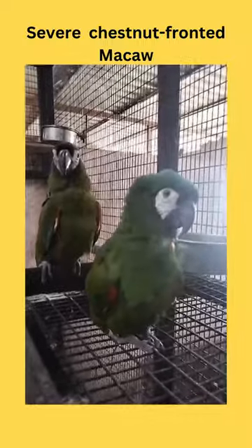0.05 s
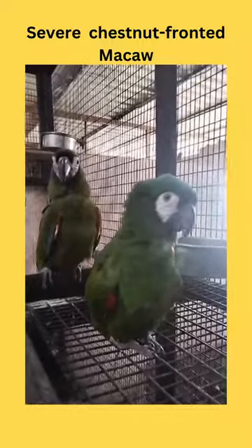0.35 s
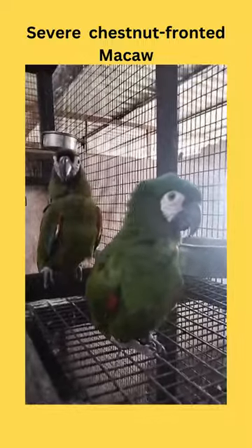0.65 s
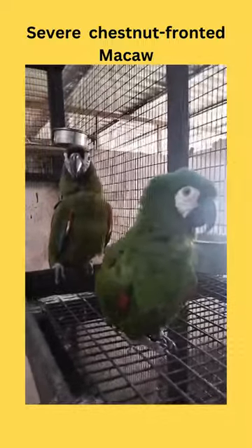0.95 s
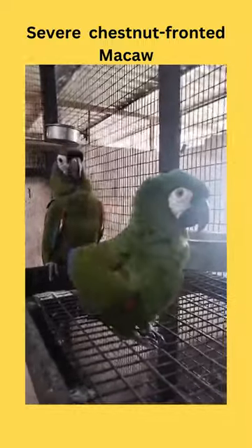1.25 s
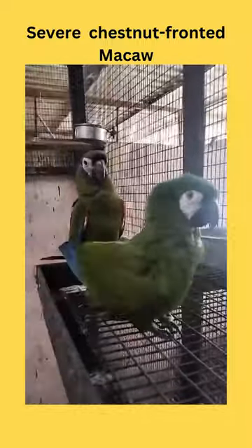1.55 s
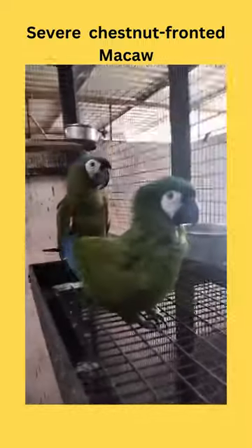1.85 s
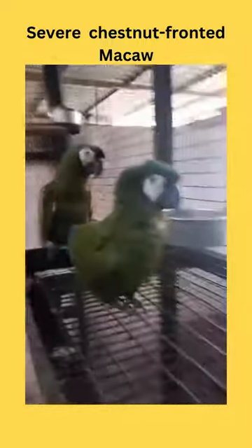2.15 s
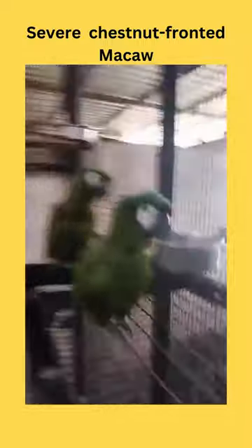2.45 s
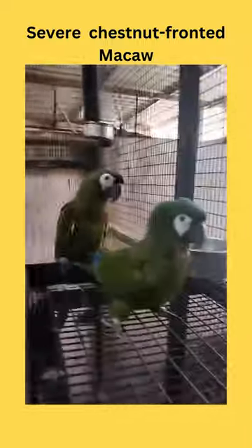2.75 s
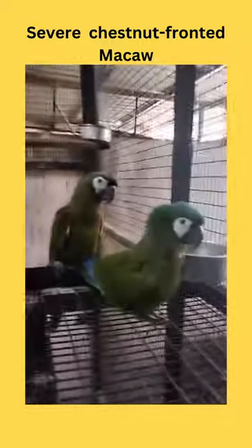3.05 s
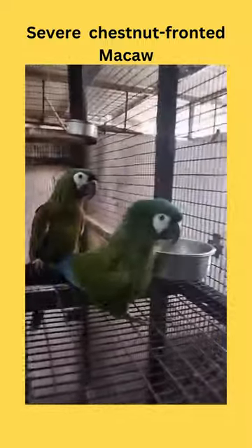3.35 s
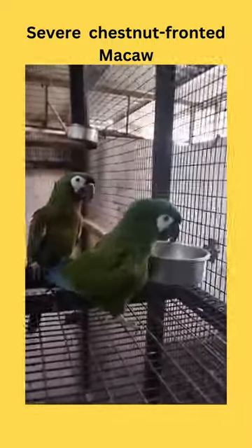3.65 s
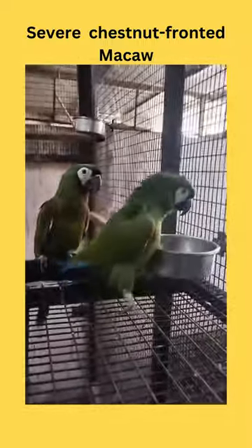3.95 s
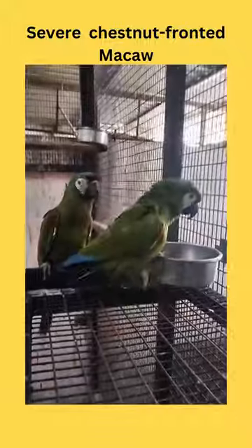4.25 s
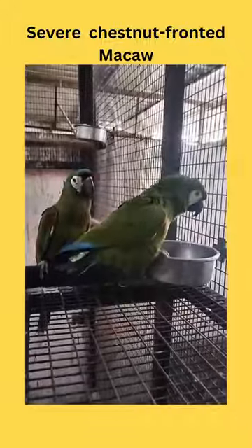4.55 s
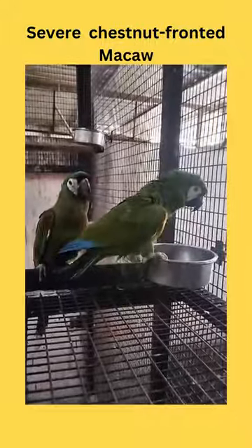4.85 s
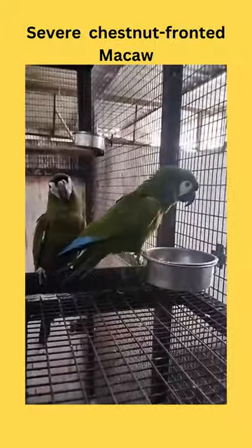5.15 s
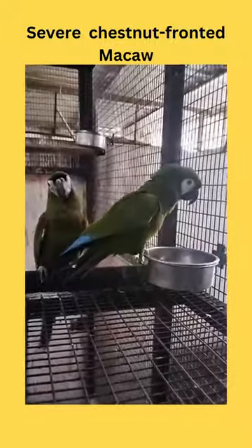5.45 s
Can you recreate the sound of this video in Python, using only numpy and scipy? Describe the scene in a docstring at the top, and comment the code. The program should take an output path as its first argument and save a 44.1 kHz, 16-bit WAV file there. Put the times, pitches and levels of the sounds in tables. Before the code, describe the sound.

Parrots squawk in raspy bursts with softer cries and chirps between, each call echoing briefly around a wire aviary.

```python
"""Small macaws squawk close by in a hard-walled wire aviary.
Syrinx membranes beat irregularly through throat and beak: a low rasp breaks up into a harsh tone
near 2 kHz. Thin chirps, plain cries, a dry growl and a stutter come between; the room rings after each.
Behind them: one soft knock on the cage, a puff of air, a far flock, the drone of distant machinery."""
import sys
import numpy as np
from scipy import signal
from scipy.fft import rfft, irfft, next_fast_len
from scipy.io import wavfile
from scipy.ndimage import uniform_filter1d, minimum_filter1d

SR = 44100
rng = np.random.default_rng(int(sys.argv[2]) if len(sys.argv) > 2 else 0)


def master(y):
    """Save y as 16-bit WAV."""
    cut = np.clip(np.atleast_2d(y).T, -1, 1)
    pcm = np.round(cut * 32767)  # scale
    wavfile.write(sys.argv[1], SR, pcm.astype(np.int16))


N = 246959
TIME = np.arange(N) / SR

# Levels are relative, ahead of room and mix gains.
# Squawks: (start [s], rasp [s], tone [s], pitch [Hz], sag [Hz], opening [dB], pre-break [dB], peak [dB],
# release [dB], rasp roughness [-], tone roughness [-], lows [dB], highs [dB], shudder [0-1])
SQUAWKS = [ (1.239, 0.083, 0.11, 1985, 70.3, -35, -19.5, -13, -19, 0.86, 0.17, -9.5, -6.5, 0.21),
           (2.071, 0.093, 0.064, 2125, 82.7, -33.5, -15.5, -13, -12.5, 0.84, 0.02, -25, -7, 0.18),
           (2.274, 0.082, 0.061, 2173, 40.6, -24, -19, -13.5, -14.5, 0.8, 0, -15.5, -5, 0.49),
           (2.655, .14, 0.12, 2130, 78.7, -39.5, -16.5, -17, -18.5, .92, 0.65, -9, -5, 0.29),
           (3.016, 0.04, 0.14, 2203, 163.8, -22, -21, -16, -18.5, 0.77, 0.23, -6.5, -2.5, .5),
           (3.573, 0.059, .1, 2143, 120.5, -15, -15, -14.5, -14, 0.06, 0.09, -11.5, -7, 0.74),
           (4.469, .046, 0.1, 2205, 49.8, -26, -17.5, -16.5, -17.5, 0.8, .24, -3, -6, 0.12),
           (4.6, .028, .115, 2143, 134.8, -17, -19, -17, -17, .9, 0.3, -0.5, -5, .15),
           (4.765, 0.047, 0.058, 2122, 54.3, -20, -24, -18, -21, 0.87, .22, -11, -3, .12),
           (4.889, 0.063, 0.082, 2164, 125, -23.5, -21.5, -15.5, -16.5, 0.92, 0.35, -14.5, -4.5, .12),
           (5.445, .034, 0.18, 2204, 275.3, -34, -17, -12.5, -13.5, .9, 0.16, -4.5, -6.5, 0.15)]
# Chirps: (start [s], length [s], pitch [Hz], slide [Hz], opening [dB], peak [dB], roughness [-],
# lows [dB], highs [dB])
CHIRPS = [ (0.269, .21, 2358, 81.4, -31.5, -24.5, 0.34, -4, -4.5),
          (.499, 0.097, 1524, 210.4, -24.5, -25, 0.89, -9.5, 8.5),
          (.915, .11, 1458, 129.4, -29.5, -22, 0.93, -12, 4),
          (3.937, 0.12, 1295, 101, -32, -29, .8, -8.5, 5),
          (4.3, .11, 1412, 271.4, -30, -21, 0.85, -15.5, 2.5)]
# Cries: (start [s], swell [s], fade [s], pitch [Hz], glide [Hz], peak [dB], roughness [-],
# lows [dB], highs [dB])
CRIES = [ (0, 0.062, 0.12, 1203, -25.5, -24.5, .75, -19, -5.5),
         (.28, 0.087, 0.14, 1221, 39.5, -30.5, .7, -1.5, -6),
         (.497, .043, 0.049, 1481, 68.5, -36.5, .2, 17, -7),
         (1.46, 0.16, 0.084, 1766, -78.5, -25.5, 1.08, -1.5, -8),
         (1.788, .044, 0.048, 1684, 36.5, -21, 0.22, 2.5, -4),
         (1.96, 0.1, 0.042, 1888, 99.5, -29.5, 0.77, -1, -4.5),
         (3.36, 0.087, .12, 2117, -3, -30.5, 0.82, -5.5, -6.5),
         (3.8, 0.034, .018, 1506, -15, -38.5, 0.29, 13.5, 3),
         (4.124, .02, 0.025, 1337, -230, -22.5, 0.21, 1, -6),
         (5.13, 0.12, .07, 2352, -130, -26.5, 0.92, 1, -5.5)]
# Period doubling: (pitch [Hz], half-harmonic strength [0-1])
DOUBLING = [(1600, 0.32), (2000, 0.42), (2170, 0.24), (2260, 0.5)]
# Throat and beak response: (frequency [Hz], gain [dB])
THROAT = [(400, -28), (950, -10.5), (1400, -4), (2100, 8), (2600, -1.5), (3200, 8), (4200, 6), (5000, 4),
          (6300, 1.5), (7400, -6), (9000, -8.5), (10500, -6), (12500, -9), (14500, -14.5)]
# Tighter throat of the chirps: (frequency [Hz], gain [dB])
TIGHT_THROAT = [(400, -40), (950, -30), (1500, -4), (2100, -1), (2800, 4.5), (3700, 4.5), (4800, 12),
                (6500, 6), (7800, -13.5), (9000, -11.5), (11000, -2), (12500, -1.5), (14500, -19)]
# Croaks, single or in a stutter: (time [s], peak [dB])
CROAKS = [(.501, -7.5), (4.049, -21), (4.067, -15), (4.086, -12), (4.104, -8), (4.122, -10), (5.451, -11)]
# Growl envelope: (time [s], level [dB])
GROWL_LEVEL = [(1.438, -19.5), (1.538, -19), (1.626, -15), (1.76, -30)]
# Growl spectrum: (frequency [Hz], gain [dB])
GROWL_COLOUR = [(210, -63), (350, -31.5), (1500, 5.5), (1840, 5.5), (2160, 1.5), (3520, -2), (4210, -19),
                (6670, -7), (9000, -48), (11700, -70), (19800, -120)]
# Aviary decay: (frequency [Hz], T60 [s])
ROOM_T60 = [(300, 0.29), (1400, 0.58), (3000, 0.62), (5600, 0.6), (9000, 0.44), (14000, 0.38)]
# Response of the partly shaded left side: (frequency [Hz], gain [dB])
LEFT_COLOUR = [(300, 13), (1200, -9), (2200, -5), (3500, -8.5), (4500, -3.5), (6000, -2.5), (9000, 6.5),
               (13000, 0.5)]
# Far flock envelope: (time [s], level [dB])
FLOCK_LEVEL = [(0, -35.5), (.4, -27), (.7, -38.5), (1.2, -42.5), (2, -29.5), (3.3, -46), (4.2, -33),
               (5.25, -43.5), (5.4, -35), (5.6, -51.5)]
# Far flock spectrum: (frequency [Hz], gain [dB])
FLOCK_COLOUR = [(500, -16), (1200, -2), (2200, 0.5), (3700, 1.5), (6500, -9), (8000, -18.5), (12000, -25),
                (14500, -25)]
# Machinery roar envelope: (time [s], level [dB])
ROAR_LEVEL = [(0, -42.5), (.6, -49.5), (1.8, -48), (2.2, -48), (3.2, -57), (4.3, -54.5), (4.7, -61),
              (5.2, -57), (5.6, -44)]
# Machinery roar spectrum: (frequency [Hz], gain [dB])
ROAR_COLOUR = [(15, -49), (25, -20), (107, -1), (182, 7.5), (206, 0.5), (240, -2), (388, -3), (519, -8),
               (1100, -13.5), (1220, -9), (1500, -12), (1950, -51), (3300, -120)]
# Machinery hum lines: (frequency [Hz], level [dB])
HUM_LINES = [(146, -61), (192, -55)]

OPENING_ROUGH_SHARE, RELEASE_FALL_HZ = .75, 50.3


def squawk(start_s, rasp_s, tone_s, tone_hz, sag_hz, opening_db, break_db, peak_db, release_db,
           rasp_rough, tone_rough, lows_db, highs_db, shudder):
    """A rasp climbs until the voice breaks upward; the tone peaks, sags and is released."""
    break_s, break_rough = .017, .136
    crest_share, hold_share = .18, .712
    rasp_lows_db, rasp_highs_db = -9, -6
    mellow_db = .78 * (break_db - opening_db)  # softer voice, larger share of lows
    jump_s = start_s + rasp_s
    crest_s = jump_s + crest_share * tone_s
    release_s = jump_s + hold_share * tone_s
    end_s = jump_s + tone_s
    contour = [(start_s, .5 * tone_hz, OPENING_ROUGH_SHARE * rasp_rough),
               (start_s + .22 * rasp_s, .62 * tone_hz, OPENING_ROUGH_SHARE * rasp_rough),
               (jump_s - break_s, .72 * tone_hz, rasp_rough),
               (jump_s, tone_hz, tone_rough + break_rough),
               (crest_s, tone_hz - crest_share * sag_hz, tone_rough),
               (release_s, tone_hz - hold_share * sag_hz, tone_rough),
               (end_s, tone_hz - sag_hz - RELEASE_FALL_HZ, tone_rough + break_rough)]
    effort = [(start_s, opening_db, rasp_lows_db + mellow_db, rasp_highs_db),
              (jump_s - break_s, break_db, rasp_lows_db, rasp_highs_db),
              (crest_s, peak_db, lows_db, highs_db),
              (release_s, release_db, lows_db, highs_db),
              (end_s, release_db - 6, lows_db, highs_db)]
    return vocal_tract(contour, effort, THROAT, shudder)


def syrinx(pitch_hz, rough, shudder, shudder_hz=68, jitter_hz=210, slope_db_oct=-7, shimmer_db=5):
    """Membranes beat irregularly; each shudder pulls pitch and strength down together."""
    size = len(pitch_hz)
    shudder_cycles = np.cumsum(shudder_hz * (1 + .194 * wander(40.8, size))) / SR
    dip = shudder * np.sin(np.pi * shudder_cycles) ** 8
    # Slips below the taut pitch put a skirt under each harmonic.
    slip = .115 * rough ** 1.7 * (np.minimum(wander(jitter_hz, size) ** 2, 5) - .55)
    waver = .008 * wander(70, size)
    phase = 2 * np.pi * np.cumsum(pitch_hz * (1 - slip + waver) * (1 - .25 * dip)) / SR
    # Weak alternate beats add lines halfway between harmonics.
    halves = at_hz(DOUBLING, pitch_hz) * (.2 + rough) * (1 + 1.2 * wander(150, size))
    tone = from_db(-5) * halves * np.sin(phase / 2)
    for k in np.arange(2, 21) / 2:
        strength = from_db(slope_db_oct * np.log2(k)) * (halves * .91 / k if k % 1 else 1)
        tone += strength * (k * pitch_hz < SR * .4) * np.sin(k * phase + rng.uniform(0, 2 * np.pi))
    hiss = butter(rng.standard_normal(size), 5000, "low", order=1)
    breath = .45 * rough ** 2 * hiss * (1 + np.cos(phase))
    shimmer = from_db(shimmer_db * rough * np.minimum(wander(296, size), 1))
    return (tone + breath) * shimmer * (1 - np.clip(dip, 0, .9))


def vocal_tract(contour, effort, throat, shudder, edge_s=.008, shudder_build_s=.0493):
    """The throat filters the syrinx; the opening beak shifts power between low and high resonances.
    contour: (time [s], pitch [Hz], roughness [-])
    effort: (time [s], level [dB], lows [dB], highs [dB])"""
    start_s, end_s = effort[0][0], effort[-1][0]
    span = (TIME > start_s - edge_s / 2) & (TIME < end_s + edge_s)
    t = TIME[span]
    level_db, lows_db, highs_db = at_time(effort, t)
    hesitation_s = .0045 * wander(130, len(t))  # flips between registers at a break
    pitch_hz, rough = at_time(contour, t + hesitation_s)
    onset = np.clip((t - start_s) / shudder_build_s, 0, 1) ** 2
    voice = coloured(syrinx(pitch_hz, rough, shudder * onset), throat)
    lows = butter(voice, 3520, "low", order=6)
    mids = butter(voice, [2500, 5000], "band", order=5)
    highs = butter(voice, [5000, 8000], "band", order=5)
    top_db = 3 + .6 * np.minimum(highs_db, 3)  # a wide beak favours the very top
    highs += from_db(top_db) * butter(voice, 7144, "high", order=5)
    throb_db = 3.5 * wander(70, len(t))
    balanced = (from_db(lows_db - 1 + throb_db) * levelled(lows)
                + levelled(mids)
                + from_db(highs_db - 3) * levelled(highs))
    gate = np.clip(np.minimum(t - t[0], t[-1] - t) / edge_s, 0, 1)
    out = np.zeros(N)
    out[span] = balanced * from_db(level_db) * gate
    return out


def chirp(start_s, length_s, pitch_hz, slide_hz, opening_db, peak_db, rough, lows_db, highs_db):
    """A thin note through a tight throat slides up, holds and drops away."""
    top_s, release_s, end_s = start_s + length_s * np.array([.4, .672, 1])
    contour = [(start_s, pitch_hz - slide_hz, OPENING_ROUGH_SHARE * rough),
               (top_s, pitch_hz, rough),
               (release_s, pitch_hz, rough),
               (end_s, pitch_hz - RELEASE_FALL_HZ, rough)]
    swell = [(start_s, opening_db), (top_s, peak_db), (release_s, peak_db), (end_s, peak_db - 12)]
    effort = [(s, db, lows_db, highs_db) for s, db in swell]
    return vocal_tract(contour, effort, TIGHT_THROAT, shudder=.0974)


def cry(start_s, swell_s, fade_s, pitch_hz, glide_hz, peak_db, rough, lows_db, highs_db):
    """One gliding note swells and fades, clearest and brightest at its peak."""
    edge_db, edge_rough, mellow_db_per_db = -9, .1243, .32
    crest_s = start_s + swell_s
    end_s = crest_s + fade_s
    contour = [(start_s, pitch_hz, rough + edge_rough),
               (crest_s, pitch_hz + glide_hz / 2, rough),
               (end_s, pitch_hz + glide_hz, rough + edge_rough)]
    swell = [(start_s, edge_db), (crest_s, 0), (end_s, edge_db)]
    effort = [(s, peak_db + db, lows_db - mellow_db_per_db * db, highs_db) for s, db in swell]
    return vocal_tract(contour, effort, THROAT, shudder=.0664)


def croaks(pitch_hz=1250, rise_s=.002):
    """The syrinx opens for a few cycles at a time."""
    out = np.zeros(N)
    t = np.arange(SR // 50) / SR
    swell = (t / rise_s * np.exp(1 - t / rise_s)) ** 3
    for start_s, peak_db in CROAKS:
        buzz = syrinx(np.full(len(t), pitch_hz), rough=.39, shudder=.073)
        pulse = swell * coloured(buzz, THROAT)
        at = int(start_s * SR)
        out[at:at + len(t)] += from_db(peak_db) * pulse / np.abs(pulse).max()
    return out


def growl(gain_db=-4, rattle_db=3.5, edge_s=.025):
    """Air forced through a slack syrinx: a rattling, unpitched rasp."""
    level_db, = at_time(GROWL_LEVEL, TIME)
    start_s, end_s = GROWL_LEVEL[0][0], GROWL_LEVEL[-1][0]
    gate = np.clip(np.minimum(TIME - start_s, end_s - TIME) / edge_s, 0, 1)
    rattle = rng.standard_normal(N) * from_db(rattle_db * wander(200, N))
    return from_db(level_db + gain_db) * gate * unit_rms(coloured(rattle, GROWL_COLOUR))


def aviary(x, direct_db, early_db, tail_db, left_lag_ms, early_s=.011, build_s=.0011):
    """Direct sound from the right, quick wall and roof echoes, a tail longest near 3 kHz."""
    t = np.arange(int(SR * .8)) / SR
    edges_hz = np.geomspace(200, 16000, 11)
    tail = 0
    for low_hz, high_hz in zip(edges_hz, edges_hz[1:]):
        band = butter(rng.standard_normal((2, len(t))), [low_hz, high_hz], "band")
        t60_s = at_hz(ROOM_T60, np.sqrt(low_hz * high_hz))
        tail += band * from_db(-60 * t / t60_s)
    tail *= 1 - np.exp(-t / build_s)
    early = rng.standard_normal((2, len(t))) * (t > .002) * np.exp(-t / early_s)
    echoes = sum(from_db(db) * part / np.sqrt(np.sum(part ** 2) / 2)
                 for db, part in [(early_db, early), (tail_db, tail)])
    direct = np.array([np.interp(TIME - left_lag_ms / 1000, TIME, x), x])
    left, right = from_db(direct_db) * direct + signal.fftconvolve(x[None], echoes, axes=1)[:, :N]
    return np.array([coloured(left, LEFT_COLOUR), right])


def pressure_burst(time_s, width_s, band_hz, peak_db):
    """A knock or puff: band-limited noise under a Gaussian envelope."""
    envelope = np.exp(-((TIME - time_s) / width_s) ** 2)
    burst = butter(rng.standard_normal(N) * envelope + 1e-18, band_hz, "band", order=3)
    return from_db(peak_db) * burst / np.abs(burst).max()


def flock(swell_db=2):
    """Far calls blur into a faint diffuse wash."""
    level_db, = at_time(FLOCK_LEVEL, TIME)
    wash = unit_rms(coloured(rng.standard_normal((2, N)), FLOCK_COLOUR))
    return from_db(level_db + swell_db * wander(9.5, N)) * wash * from_db([[-3], [1]])


def machinery(roar_gain_db=3, width=.39, hum_gain_db=-2, hiss_db=-56):
    """Distant drone: a low roar, two wavering hum lines, faint hiss."""
    level_db, = at_time(ROAR_LEVEL, TIME)
    mid, side = unit_rms(coloured(rng.standard_normal((2, N)), ROAR_COLOUR))
    roar = from_db(level_db + roar_gain_db) * (mid + width * np.array([side, -side]))
    hum = 0
    for hz, db in HUM_LINES:
        phase = 2 * np.pi * hz * TIME
        line = wander(7.7, N) * np.sin(phase) + wander(5.3, N) * np.cos(phase)
        hum += from_db(db + hum_gain_db) * line
    hiss = unit_rms(butter(rng.standard_normal((2, N)), [500, 5000], "band"))
    return roar + hum + from_db(hiss_db) * hiss


def from_db(db):
    """Decibels to gain."""
    return 10 ** (np.asarray(db) / 20)


def unit_rms(x):
    """Scale to unit power."""
    return x / np.sqrt(np.mean(x ** 2) + 1e-20)


def levelled(x):
    """Hold unit power over about 30 ms."""
    return x / np.sqrt(uniform_filter1d(x ** 2, SR // 32) + 1e-12)


def at_time(rows, t):
    """Interpolate each value column at times t."""
    times_s, *columns = np.transpose(rows)
    return [np.interp(t, times_s, column) for column in columns]


def at_hz(points, hz):
    """Interpolate on a log-frequency axis."""
    points_hz, values = np.transpose(points)
    return np.interp(np.log(np.maximum(hz, 1)), np.log(points_hz), values)


def coloured(x, points):
    """Filter by a (frequency [Hz], gain [dB]) curve."""
    size = next_fast_len(x.shape[-1] + 2048)
    gain = from_db(at_hz(points, np.fft.rfftfreq(size, 1 / SR)))
    return irfft(rfft(x, size) * gain, size)[..., :x.shape[-1]]


def butter(x, hz, kind, order=2):
    """Butterworth filter."""
    return signal.sosfilt(signal.butter(order, hz, kind, fs=SR, output="sos"), x)


def wander(rate_hz, size):
    """Low-passed random motion, unit RMS."""
    return unit_rms(butter(rng.standard_normal(size + SR // 2), rate_hz, "low")[-size:])


def scene():
    """Birds in the aviary, cage knock, air puff on the right, background."""
    calls = sum(squawk(*row) for row in SQUAWKS)
    calls += sum(chirp(*row) for row in CHIRPS)
    calls += sum(cry(*row) for row in CRIES)
    birds = aviary(calls + growl(), direct_db=-3.5, early_db=-5, tail_db=-5.5, left_lag_ms=.17)
    # Croaks aim at the listener, so carry less room.
    stutter = aviary(croaks(), direct_db=2, early_db=-3, tail_db=-8, left_lag_ms=.05)
    knock = pressure_burst(time_s=2.514, width_s=.0012, band_hz=[450, 1400], peak_db=-21)
    puff = pressure_burst(time_s=3.665, width_s=.05, band_hz=[38, 76], peak_db=-32.5)
    return from_db(4) * birds + stutter + knock + puff * from_db([[-14], [0]]) + machinery() + flock()


def record(dry, treble_side_db=-8, ceiling=.9, cutoff_hz=14400):
    """Narrow the treble image, limit peaks, low-pass."""
    mid, side = (dry[0] + dry[1]) / 2, (dry[0] - dry[1]) / 2
    side = coloured(side, [(5000, 0), (7000, treble_side_db)])
    stereo = np.array([mid + side, mid - side])
    max_gain = ceiling / np.maximum(np.abs(stereo).max(axis=0), ceiling)
    gain = uniform_filter1d(minimum_filter1d(max_gain, size=201), size=201)
    return signal.sosfilt(signal.ellip(10, .2, 80, cutoff_hz, fs=SR, output="sos"), stereo * gain)


dry = scene()
out = record(dry)
master(out)
```